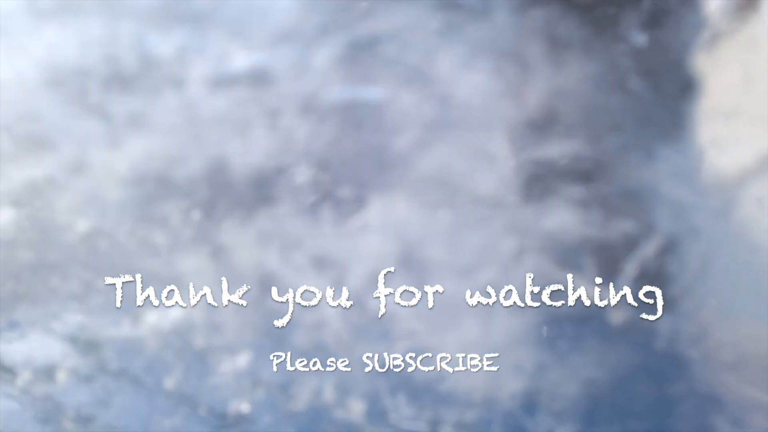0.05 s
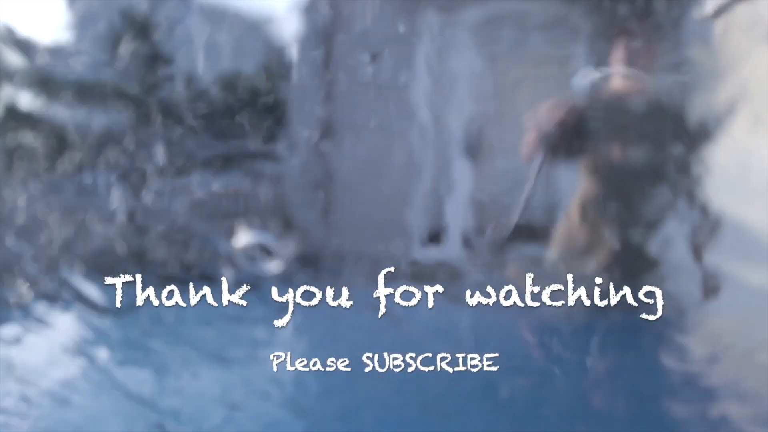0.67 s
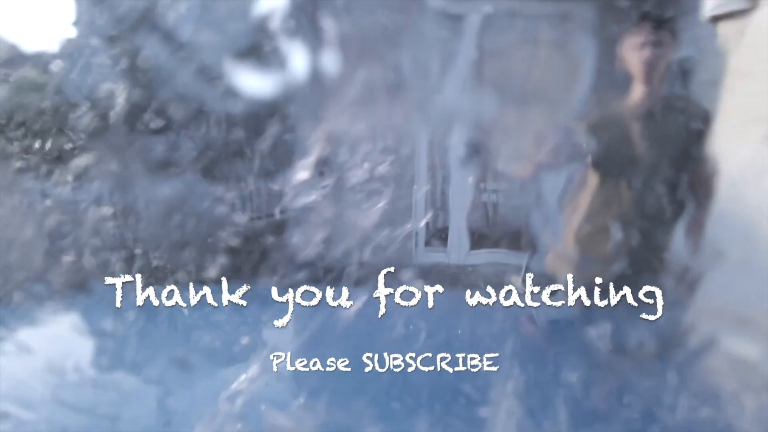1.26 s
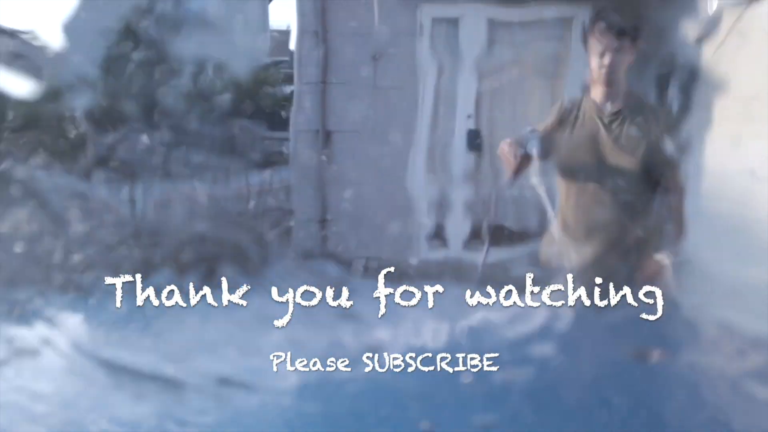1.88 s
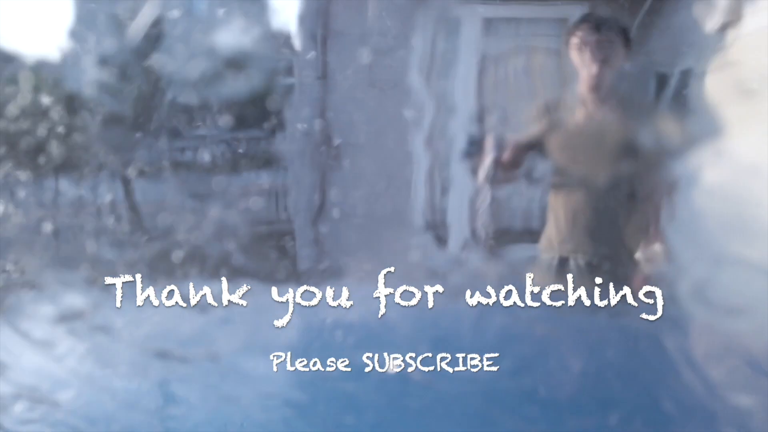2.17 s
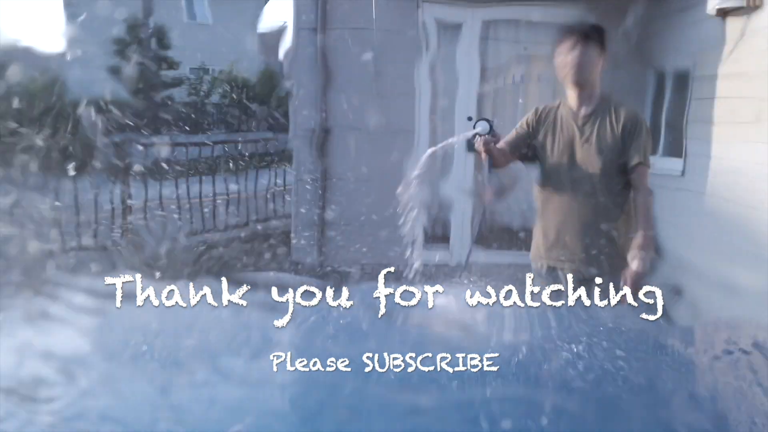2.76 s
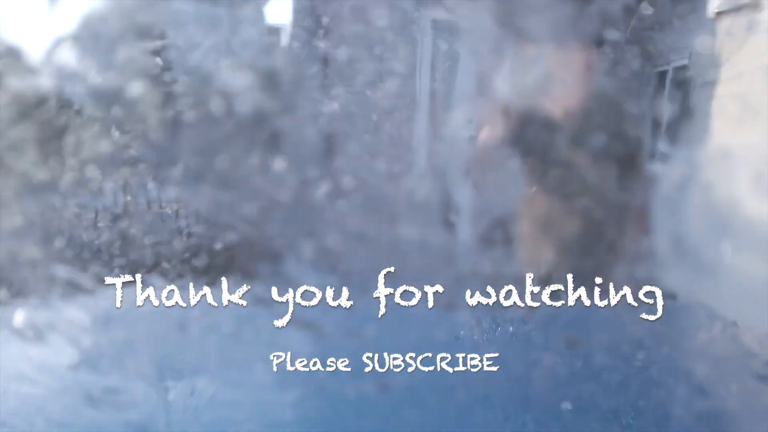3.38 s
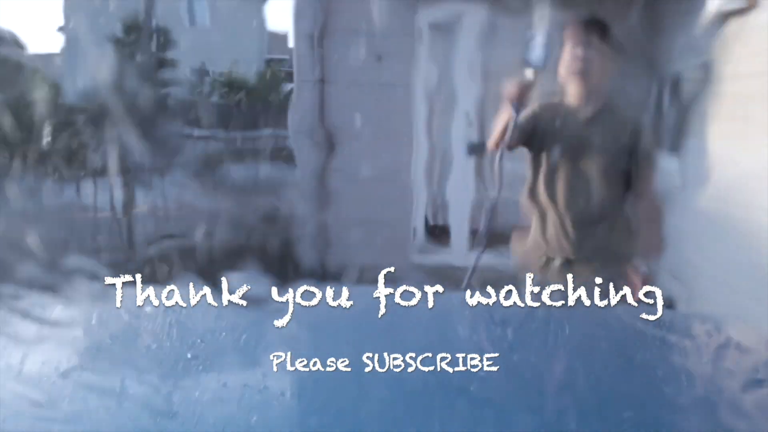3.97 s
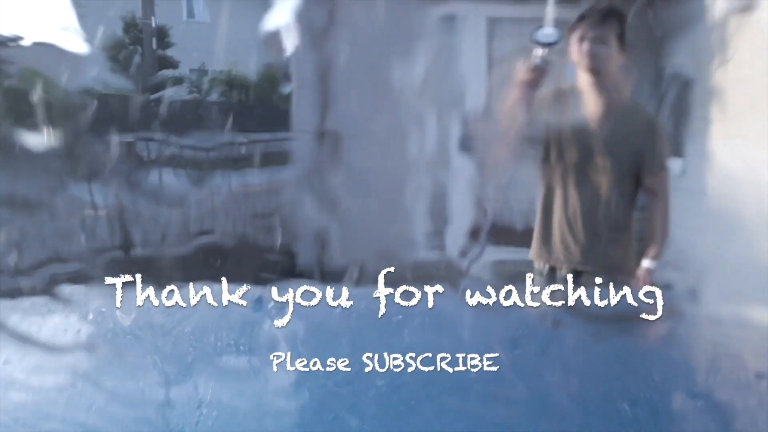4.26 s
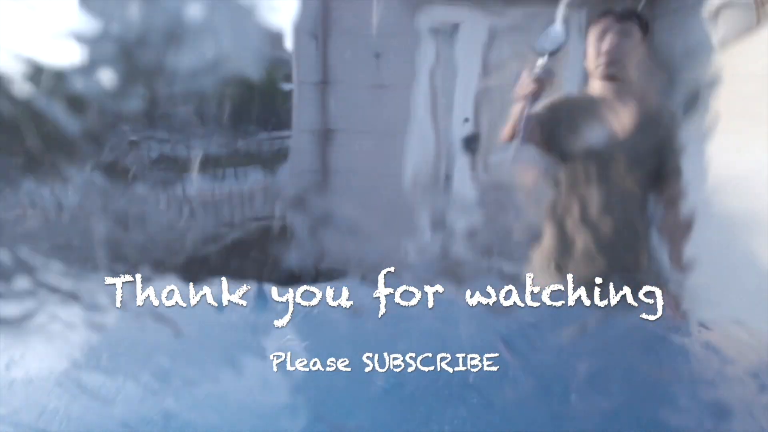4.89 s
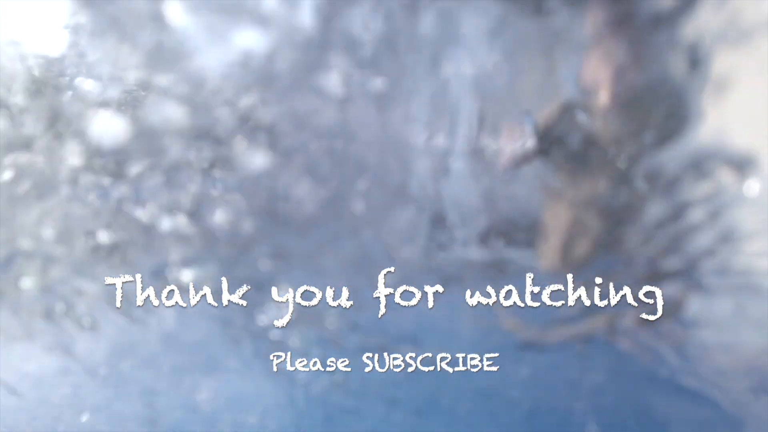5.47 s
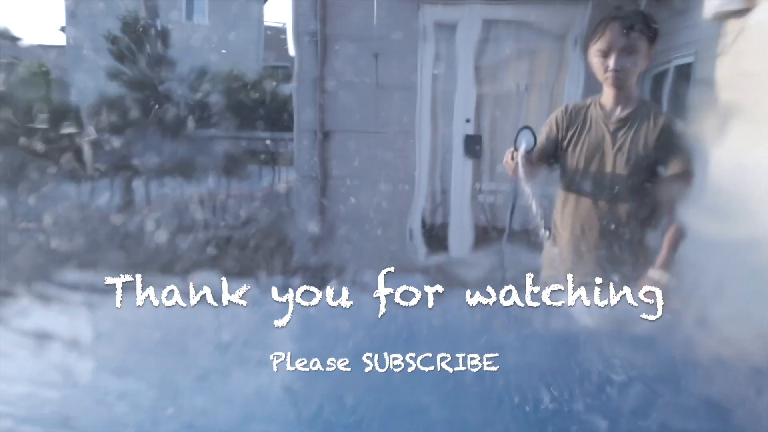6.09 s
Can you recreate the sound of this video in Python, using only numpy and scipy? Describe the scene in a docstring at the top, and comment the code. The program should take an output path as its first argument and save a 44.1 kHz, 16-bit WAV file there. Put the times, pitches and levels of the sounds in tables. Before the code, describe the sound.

A jet of water from a garden hose plays over a car, heard close up from inside the cabin. It opens with a thud and heavy drumming on the windscreen, full of splattering drops and hissing spray, surging in quick passes until about 1.5 seconds. The jet then moves onto the bodywork and becomes a quieter, duller patter, with a low bump near 1.7 seconds. From 3.2 to 3.9 seconds it hits the glass again in a few sharp, loud splashes. A lull follows from about 4 to 5.2 seconds, with only soft tapping on metal, drips and a faint wash of run-off. A brief splash comes at 5.3 seconds, then a hard, thudding burst at 5.5 and two more sweeps over the glass, easing to patter at about 6 seconds. A very faint low rumble lies underneath throughout.

```python
"""A thud, then water drumming on the windscreen: a garden hose played over a car, from the front seat.
Each of thousands of drops a second is an impulse that sets a panel ringing: fat ones make the glass drum,
small ones patter, fine spray hisses. When the jet swings off onto the bodywork only a dull patter is left.
The resonances of glass and cabin colour the impacts; beneath lie a wash of run-off and a faint rumble."""
import sys
import numpy as np
from scipy import signal
from scipy.fft import rfft, irfft, next_fast_len
from scipy.io import wavfile
from scipy.ndimage import uniform_filter1d

SR = 44100
rng = np.random.default_rng(int(sys.argv[2]) if len(sys.argv) > 2 else 0)


def file_out(sig):
    """Save sig as 16-bit WAV at sys.argv[1]."""
    # one column per channel
    cols = np.atleast_2d(sig).T
    # limit, then scale
    lim = np.clip(cols, -1, 1)
    pcm = np.round(lim * 32767).astype(np.int16)
    wavfile.write(sys.argv[1], SR, pcm)


N = 270714
TIME = np.arange(N) / SR
SIZE = next_fast_len(N + SR // 2, True)
HZ = np.maximum(np.arange(SIZE // 2 + 1) * SR / SIZE, 1)
BODY_EDGE_S = 0.024   # time the jet takes to move onto the bodywork

# difference between the two ears: f/Hz, side level relative to mid/dB
SIDE_SPECTRUM = [(60, -48), (99, -61), (160, -64), (270, -52.5), (450, -22.5), (740, -21.5), (1220, -18.5),
                 (2010, -19), (3330, -5), (5500, 1), (9080, -1), (15000, 0.5)]
# response of the sheet metal to an impact: f/Hz, relative level/dB
METAL_SPECTRUM = [(56, -32), (95, -10.5), (118, -1), (151, -9), (178, -8.5), (243, -3.5), (281, -8),
                  (334, -9.5), (400, -10.5), (520, -29.5), (880, -120)]
# sweeps of the jet across the windscreen, levels relative: start t/s, length/s, edge time/s,
# patter level/dB, change over the pass/dB, drumming level/dB, boom level/dB, spray level/dB
GLASS_SWEEPS = [(0.0, 0.45, 0.012, -26, -0.5, -21.5, -38, -45),
                (0.462, 0.1, 0.034, -30.5, -9, -34, -39, -47.5),
                (0.576, 0.11, 0.029, -26.5, 1.5, -31, -49, -42.5),
                (0.696, 0.059, 0.037, -30.5, -3.5, -44, -54, -47.5),
                (0.796, 0.14, 0.021, -26.5, 0, -27.5, -58, -43),
                (0.952, 0.026, 0.0086, -25.5, -10, -27, -54, -46.5),
                (1.007, 0.11, 0.052, -23, -4.5, -24, -55, -43), (1.127, 0.12, 0.021, -34, 6, -33, -45, -50),
                (1.25, 0.054, 0.023, -23, -4.5, -21.5, -43, -43),
                (1.356, 0.13, 0.018, -29, 1, -24.5, -38, -47),
                (3.238, 0.1, 0.029, -26, -6, -24.5, -44, -43.5),
                (3.323, 0.15, 0.066, -23, -7.5, -24, -36, -40),
                (3.591, 0.083, 0.057, -23, -6.5, -22, -31.5, -40),
                (3.815, 0.054, 0.041, -25.5, 0.5, -29, -44, -42.5),
                (4.044, 0.049, 0.04, -41.5, 7, -44, -64, -64.5),
                (5.282, 0.055, 0.063, -30.5, -2.5, -32.5, -47, -51.5),
                (5.462, 0.086, 0.029, -20.5, -6.5, -17, -38, -40),
                (5.561, 0.13, 0.022, -29.5, 7, -25.5, -42, -45),
                (5.784, 0.13, 0.021, -27.5, 6.5, -24.5, -40, -47)]
# sweeps over the bodywork, levels relative:
# start t/s, length/s, patter level/dB, drumming level/dB, boom level/dB
BODY_SWEEPS = [(1.543, 0.11, -45, -43, -54), (1.679, 0.071, -41, -32, -35), (1.806, 0.34, -46.5, -44, -49),
               (2.222, 0.17, -46.5, -44, -56), (2.474, 0.1, -51.5, -44.5, -55),
               (2.598, 0.16, -46.5, -42, -54), (2.81, 0.13, -50.5, -44, -54),
               (2.902, 0.15, -43, -40.5, -56), (3.072, 0.23, -45, -41, -57), (4.2, 0.1, -108, -53, -68),
               (4.439, 0.11, -62.5, -52, -64), (4.608, 0.14, -61.5, -54.5, -58),
               (4.83, 0.09, -63.5, -58.5, -68), (5.046, 0.093, -55.5, -44.5, -70),
               (5.194, 0.2, -63.5, -55, -66), (5.97, 0.16, -45, -38, -44)]


def from_db(db):
    """Amplitude ratio: a factor of ten for every 20 dB."""
    return 10 ** (np.asarray(db) / 20)


def rms_one(x):
    """Normalisation to unit mean power."""
    return x / np.sqrt(np.mean(x ** 2) + 1e-20)


def over_hz(points):
    """Interpolation of (f/Hz, level/dB) points on a logarithmic frequency axis."""
    hz, db = np.transpose(points)
    return np.interp(np.log(HZ), np.log(hz), db)


def filtered(x, response):
    """Linear filtering: the spectrum is multiplied by a frequency response."""
    return irfft(rfft(x, SIZE) * response, SIZE)[..., :N]


def struck(spectrum):
    """Minimum-phase response with this spectrum, falling away outside it: sharp attack, then ringing."""
    octaves_out = np.abs(np.log2(HZ / np.clip(HZ, spectrum[0][0], spectrum[-1][0])))
    db = over_hz(spectrum) - np.minimum(30 * octaves_out, 70)
    cepstrum = irfft(np.log(from_db(db)), SIZE)[:SIZE // 2]
    cepstrum[1:] *= 2   # folding the cepstrum makes the response causal
    return np.exp(rfft(cepstrum, SIZE))


def wash(spectrum, side_floor_db):
    """Steady noise whose coherence between the ears falls from bass to treble; unit power."""
    colour = struck(spectrum)
    side_gain = from_db(np.maximum(over_hz(SIDE_SPECTRUM), side_floor_db))
    mid = filtered(rng.standard_normal(N), colour)
    side = filtered(rng.standard_normal(N), colour * side_gain)
    return rms_one(np.array([mid + side, mid - side]))


def rumble():
    """The noise floor of the cabin: steady low-frequency noise."""
    # background spectrum: f/Hz, relative level/dB
    spectrum = [(11, -44.5), (18, -12), (33, 6), (49, -21), (70, -16), (91, -47), (150, -120)]
    return from_db(-58) * wash(spectrum, side_floor_db=-17)


def runoff():
    """Water running off the car is a faint, steady source of broadband noise."""
    # spectrum of the running water: f/Hz, relative level/dB
    spectrum = [(41, -62), (70, -25), (212, -1), (377, -15), (492, -13.5), (1070, -15), (1200, -20),
                (1530, -18.5), (6300, -39.5), (11000, -38.5), (14000, -55)]
    return from_db(-60.5) * wash(spectrum, side_floor_db=-27)


def drops(per_s, spread_db):
    """A Poisson process: impulses at independent moments, with log-normal sizes; unit power."""
    lands = rng.random(N) < per_s / SR
    force = lands * from_db(spread_db * np.clip(rng.standard_normal(N), -2, 2))
    return rms_one(force - force.mean())


def drips():
    """Lone heavy drips excite the impulse response of the bodywork; the jet masks them except in lulls."""
    knocks = filtered(drops(per_s=26, spread_db=0.5), struck(METAL_SPECTRUM))
    return from_db(-58.5) * rms_one(knocks)


def decay_envelope(force, t60):
    """Exponential decay: the energy of each impulse falls 60 dB in t60 seconds; returns amplitude."""
    retained = from_db(-120 / (t60 * SR))
    return np.sqrt(signal.lfilter([1 - retained], [1, -retained], force ** 2 + 1e-18))


def patch_ring(force, t60=0.048, hold_s=0.14):
    """Time-varying convolution: the patch of glass under the wandering jet has its own impulse response."""
    hop = int(hold_s * SR)
    fade = np.sin(np.pi * np.arange(2 * hop) / (2 * hop))
    decay = from_db(-60 * TIME[:SR // 12] / t60)
    padded = np.pad(force, (hop, 2 * hop))
    out = np.zeros(len(padded) + len(decay))
    for start in range(0, N + hop, hop):
        tail = decay * rng.standard_normal(len(decay))
        ring = signal.fftconvolve(padded[start:start + 2 * hop] * fade, tail / np.linalg.norm(tail))
        out[start:start + len(ring)] += ring
    return out[hop:hop + N]


def reverberation(force, stray_share=0.13, cabin_t60=0.17):
    """Incoherent sum: most drops ring one patch; strays land all over, each with its own random tail."""
    tails = decay_envelope(force, cabin_t60) * rng.standard_normal(N)
    return np.sqrt(stray_share) * tails + np.sqrt(1 - stray_share) * patch_ring(force)


def at_ears(force, wet, diffuse_hz):
    """Direct and diffuse fields: long waves reach both ears alike, short ones arrive diffuse and differ."""
    diffuse = wet * HZ ** 2 / (HZ ** 2 + diffuse_hz ** 2)
    norm = np.sqrt(1 + diffuse ** 2)
    mid = filtered(force, 1 / norm) + filtered(reverberation(force), diffuse / norm)
    side = filtered(reverberation(force), from_db(over_hz(SIDE_SPECTRUM)))
    return np.array([mid + side, mid - side])


def cabin(x):
    """Modal superposition: glass and cabin add narrow peaks and a few notches to the response."""
    # resonances of glass and cabin: f/Hz, bandwidth/Hz, gain/dB
    modes = [(61.6, 15, 3), (109, 14, 2), (146, 8.1, 5), (189.7, 13.4, 6), (271, 12.4, -5), (378, 8.9, 6),
             (585, 38, 6), (639.5, 64, 6.5), (850, 94, 3), (1080, 25, 2.5), (1298, 104, 4), (1620, 38, 3.5),
             (1865, 7.3, 1), (2480, 48, -17), (3420, 42, 1.5), (3710, 91, -8)]
    response = 1 + sum((from_db(db) - 1) / (1 + 1j * (HZ * HZ - hz * hz) / (HZ * width))
                       for hz, width, db in modes)
    return filtered(x, response)


def sweep(start, length, edge, t60, change_db=0):
    """Envelope of one pass: a rise over the edge time, a hold that swells or fades, exponential decay."""
    age = TIME - start
    attack = (1 + np.tanh(2.34 * age / edge - 0.5)) / 2
    hold_db = change_db * (np.clip(age / length, 0, 1) - 0.5)
    release = from_db(-60 * np.clip((age - length) / t60, 0, 2))
    return attack * from_db(hold_db) * release


def on_bodywork(release_s=0.21, metal_ring_s=0.19, boom_ring_s=0.51):
    """Envelopes of patter, drumming and boom: the metal rings on in free decay after the jet has left."""
    power = np.zeros((3, N))
    for start, length, *levels_db in BODY_SWEEPS:
        for layer, (db, ring_s) in enumerate(zip(levels_db, (0, metal_ring_s, boom_ring_s))):
            power[layer] += (from_db(db) * sweep(start, length, BODY_EDGE_S, release_s + ring_s)) ** 2
    return np.sqrt(power)


def on_glass(glass_ring_s=0.041, boom_ring_s=0.51, mist_lead_s=0.0034):
    """Envelopes of the passes over the windscreen: being incoherent, they add in power."""
    power = np.zeros((5, N))
    for start, length, edge, db, change_db, drum_db, boom_db, spray_db in GLASS_SWEEPS:
        t60 = 5.72 * edge   # a sweep that comes slowly leaves slowly
        patter = from_db(db) * sweep(start, length, edge, t60, change_db)
        drum = from_db(drum_db) * sweep(start, length, edge, t60 + glass_ring_s, change_db)
        boom = from_db(boom_db) * sweep(start, length, edge, t60 + boom_ring_s, change_db)
        # the mist round the jet arrives just before it
        mist = from_db(spray_db) * sweep(start - mist_lead_s, length + mist_lead_s, edge, t60, change_db)
        # water thrown off the glass rains back on the bodywork
        fallback = from_db(db - 19) * sweep(start + length / 2, length / 2, length / 2, t60=1)
        power += np.square([patter, drum, boom, mist, fallback])
    return np.sqrt(power)


def surges():
    """Amplitude modulation: the level of the heavy drops shifts briefly as the core of the jet lands."""
    # square hits on the glass: centre t/s, half-length/s, gain/dB
    hits = [(0.01, 0.048, 6), (0.22, 0.091, 4), (0.41, 0.03, 1.5), (0.886, 0.025, 2), (1.08, 0.042, 3.5),
            (3.404, 0.021, 5), (3.65, 0.029, 4), (5.692, 0.022, 2.5), (5.91, 0.022, -1.5)]
    return from_db(sum(db * np.cos(np.pi / 2 * np.clip((TIME - centre) / half, -1, 1)) ** 2
                       for centre, half, db in hits))


def envelopes(near_db=-49.5, far_dulling=0.16):
    """Power summation of all the water that lands, giving one envelope for each layer of the sound."""
    glass, glass_drum, glass_boom, glass_spray, fallback = on_glass()
    body, body_drum, body_boom = on_bodywork()
    surge = surges()
    # below near_db the jet is further off, and its treble fades faster than its patter
    body_treble = body * np.minimum(body / from_db(near_db), 1) ** far_dulling
    glass_splatter = from_db(-1.5) * np.sqrt(surge * glass * glass_spray)
    boom = [glass_boom, body_boom]
    metal_drum = [body_drum, from_db(2.5) * fallback]
    patter = [surge * glass, body, fallback]
    splatter = [glass_splatter, from_db(-9) * body_treble, from_db(-13.5) * fallback]
    spray = [glass_spray, from_db(-29.5) * body_treble, from_db(-25) * fallback]
    layers = boom, [surge * glass_drum], metal_drum, patter, splatter, spray
    return [np.linalg.norm(parts, axis=0) for parts in layers]


def bubbles(per_s, low_hz, high_hz, cycles, spread_db):
    """Air caught in the water film resonates: damped, slightly rising tones; unit power."""
    out, t = np.zeros((2, N + SR)), TIME[:SR // 40]
    for moment, pitch, size, phase in rng.random((int(per_s * N / SR), 4)):
        hz = low_hz * (high_hz / low_hz) ** pitch
        age = t * hz / cycles   # reaches 1 after a decay of 60 dB
        angle = 2 * np.pi * hz * t * (1 + 0.042 * age)
        ear_phase = np.array([[0], [phase * min(hz / 900, 2 * np.pi)]])   # path difference to the ears
        envelope = from_db(spread_db * size - 60 * age) * (1 - np.exp(-t * hz))
        start = int(moment * N)
        out[:, start:start + len(t)] += envelope * np.sin(angle + ear_phase)
    return rms_one(out[:, :N])


def ticks(per_s, spread_db, t60):
    """Stray drops fly off the jet and land alone, each a broadband transient; unit power."""
    sizes = (rng.random(N) < per_s / SR) * from_db(spread_db * rng.uniform(-1.1, 1, N))
    return rms_one(decay_envelope(sizes, t60) * rng.standard_normal((2, N)))


def splashes(gain_db=-3, t60=0.25, sharp_edge_s=0.014):
    """Onset transients: each pass opens with a decaying volley of drops, weaker for a slow sweep."""
    onsets = [(s, edge, db) for s, _, edge, db, *_ in GLASS_SWEEPS]
    onsets += [(s, BODY_EDGE_S, db) for s, _, db, *_ in BODY_SWEEPS]
    volley = np.zeros(N)
    for s, edge, db in onsets:
        start = int(s * SR)
        suddenness = min(sharp_edge_s / edge, 1) ** 2
        volley[start:] += suddenness * from_db(db + gain_db - 60 * TIME[:N - start] / t60)
    force = at_ears(drops(per_s=5400, spread_db=3.5), wet=0.83, diffuse_hz=805)
    band = signal.butter(2, [500, 2830], "band", fs=SR, output="sos")
    return volley * rms_one(signal.sosfilt(band, force))


def dwells(force):
    """Selective excitation: a resonance swells and fades as the jet crosses the place that drives it."""
    # resonances of the glass driven in turn: centre t/s, half-length/s, f/Hz, bandwidth/Hz, level/dB
    resonances = [(0.185, 0.12, 380, 50, -26), (0.196, 0.25, 950, 122, -35), (0.667, 0.13, 269, 65, -25.5),
                  (0.924, 0.034, 210, 90, -21.5), (1.11, 0.15, 142, 49.7, -31.5),
                  (0.876, 0.07, 4830, 1400, -36), (1.288, 0.03, 2980, 900, -39),
                  (1.464, 0.055, 320, 109, -30), (3.314, 0.043, 135, 40, -23.5),
                  (3.4, 0.022, 1707, 59.6, -22.5), (3.638, 0.036, 650, 240, -30),
                  (5.536, 0.041, 412, 109, -20.5), (5.674, 0.059, 2900, 900, -35.5)]
    out = np.zeros((2, N))
    for centre, half, hz, width, db in resonances:
        near = np.flatnonzero(np.abs(TIME - centre) < half)
        swell = np.cos(np.pi / 2 * (TIME[near] - centre) / half) ** 2
        band = signal.butter(2, [hz - width / 2, hz + width / 2], "band", fs=SR, output="sos")
        out[:, near] += from_db(db) * swell * rms_one(signal.sosfilt(band, force[:, near]))
    return out


def slugs(gain_db=-4, t60=0.021):
    """A damped oscillator: each slug of water pushes the glass in; it springs back and rings briefly."""
    # the heaviest slugs thudding on the glass: t/s, relative level/dB, f/Hz
    thuds = [(0.009, -0.5, 188), (0.041, -5, 274), (0.219, -4, 388), (0.251, -13, 294), (0.267, -10, 261),
             (0.288, -4.5, 340), (0.401, -6, 200), (0.495, -14, 232), (0.836, -11.5, 243), (1.069, -3, 197),
             (1.363, -8.5, 395), (1.675, -17, 234), (3.254, -5, 300), (3.632, -6.5, 637), (3.649, -9, 670),
             (5.499, -1, 390), (5.519, -3, 506), (5.552, 2, 344), (5.904, -18, 245)]
    out, t = np.zeros(N), TIME[:SR // 5]
    for s, db, hz in thuds:
        thud = from_db(db + gain_db - 60 * t / t60) * np.sin(2 * np.pi * hz * t)
        start = int(s * SR)
        out[start:start + len(t)] += thud[:N - start]
    bass_cut = signal.butter(2, 115, "high", fs=SR, output="sos")   # the thuds carry no deep bass
    return signal.sosfilt(bass_cut, out)


def clumps(bandwidth_hz, depth_db):
    """Random amplitude modulation: the jet breaks into clumps, so the impacts come in flurries."""
    lowpass = signal.butter(2, bandwidth_hz, fs=SR, output="sos")
    return from_db(depth_db * rms_one(signal.sosfilt(lowpass, rng.standard_normal(N))))


def ringing(force, spectrum, even_s):
    """Forced vibration: impacts drive a panel's response; the flow holds the power steady over even_s."""
    vibration = rms_one(filtered(force, struck(spectrum)))
    span = int(even_s * SR)
    power = uniform_filter1d(uniform_filter1d(vibration.mean(axis=0) ** 2, span), span)
    return vibration / np.sqrt(np.abs(power) + 1e-6)


def jet():
    """Impact excitation: fat drops drive the low ringing, finer and more numerous ones the treble."""
    # spectra of the parts of an impact, from bass to treble: f/Hz, relative level/dB
    boom_spectrum = [(31, -35), (52, 9), (75, 3.5), (95, 7.5), (120, -17), (210, -120)]
    drum_spectrum = [(56, -31.5), (95, -10), (119, 4), (151, -5), (183, 3.5), (226, -7.5), (258, 5),
                     (291, -2), (328, 4.5), (381, -14.5), (400, 2), (520, -28.5), (880, -120)]
    patter_spectrum = [(240, -32.5), (400, 3.5), (435, -3), (653, -7), (744, -5.5), (1050, -3),
                       (1140, -6.5), (1670, -8), (2500, -12.5), (3250, -50.5), (5500, -120)]
    splatter_spectrum = [(1470, -37.5), (2500, 0.5), (3760, -2), (6460, -22.5), (8000, -31), (10400, -40),
                         (17600, -120)]
    spray_spectrum = [(2820, -8), (4800, -3), (5850, -4), (8060, -2.5), (9300, -6), (11400, -3.5),
                      (15000, -14), (15600, -15)]
    boom, glass_drum, metal_drum, patter, splatter, spray = envelopes()
    flurry = clumps(bandwidth_hz=153, depth_db=1.2)
    fat = at_ears(drops(per_s=520, spread_db=2) * flurry, wet=1, diffuse_hz=880)
    small = at_ears(drops(per_s=1700, spread_db=3.5) * flurry, wet=1.26, diffuse_hz=880)
    mist = drops(per_s=5000, spread_db=1.5) * clumps(bandwidth_hz=330, depth_db=2)
    fine = at_ears(mist, wet=1.2, diffuse_hz=800)
    strays = ticks(per_s=70, spread_db=11.5, t60=0.072)
    splatter_force = small + 0.27 * fat + 0.43 * strays
    spray_force = fine + 0.26 * small + 0.57 * strays
    out = from_db(-2) * boom * ringing(fat, boom_spectrum, even_s=0.046)
    out += from_db(-2.5) * glass_drum * ringing(fat, drum_spectrum, even_s=0.034)
    out += from_db(-1) * metal_drum * ringing(fat, METAL_SPECTRUM, even_s=0.018)
    out += from_db(-1.56) * patter * ringing(fat + 0.58 * small, patter_spectrum, even_s=0.045)
    out += from_db(0.17) * splatter * ringing(splatter_force, splatter_spectrum, even_s=0.18)
    out += from_db(0.75) * spray * ringing(spray_force, spray_spectrum, even_s=0.068)
    out += from_db(-4) * splatter * bubbles(per_s=160, low_hz=1348, high_hz=4310, cycles=65, spread_db=30)
    out += from_db(-7) * spray * bubbles(per_s=110, low_hz=4360, high_hz=11960, cycles=78, spread_db=31)
    return out + dwells(fat + small) + slugs() + splashes()


def scene():
    """Superposition: rumble and run-off lie under the impacts, which the cabin colours."""
    return rumble() + runoff() + cabin(jet() + drips())


def record(dry, cutoff_hz=15750):
    """Soft saturation rounds the highest peaks; a steep low-pass removes the top of the treble."""
    return filtered(np.tanh(dry), 1 / np.sqrt(1 + (HZ / cutoff_hz) ** 300))


dry = scene()
out = record(dry)
file_out(out)
```